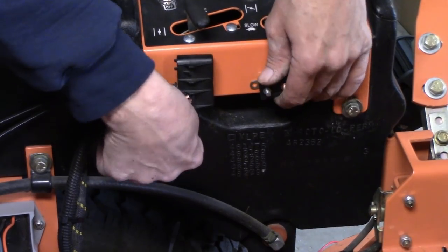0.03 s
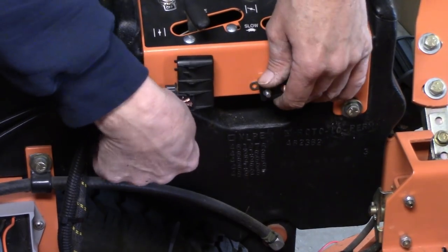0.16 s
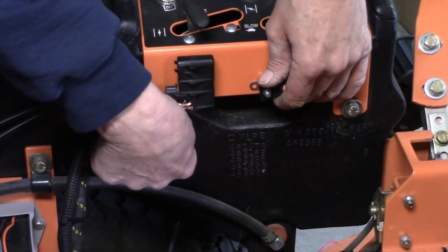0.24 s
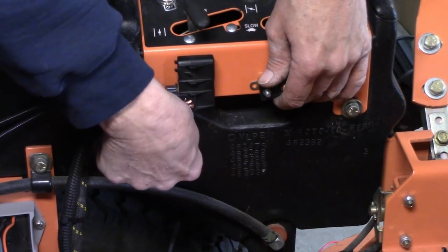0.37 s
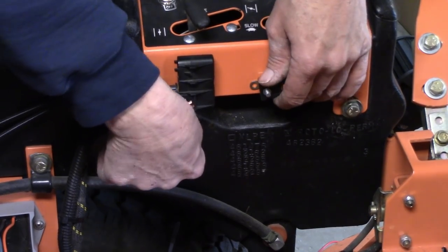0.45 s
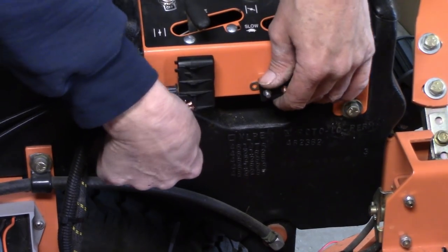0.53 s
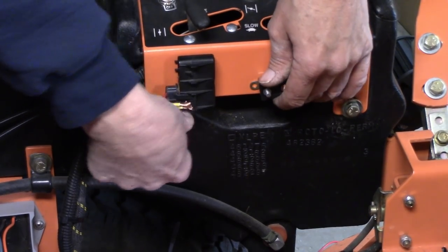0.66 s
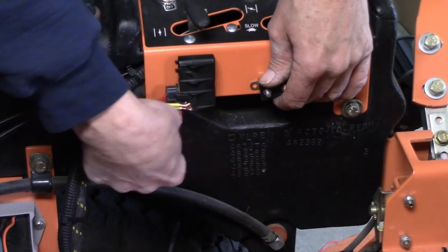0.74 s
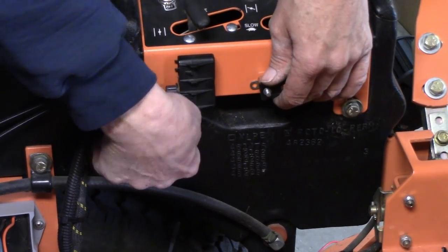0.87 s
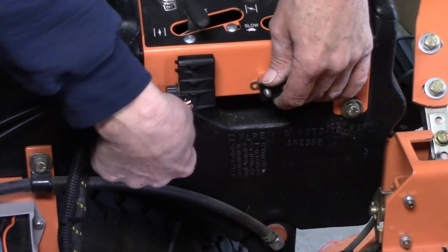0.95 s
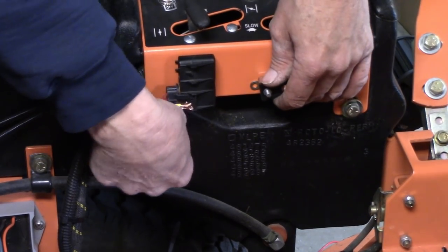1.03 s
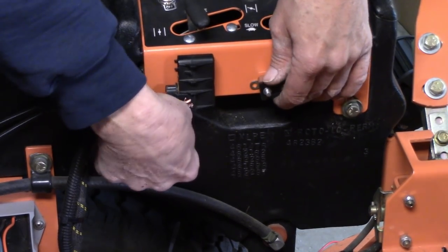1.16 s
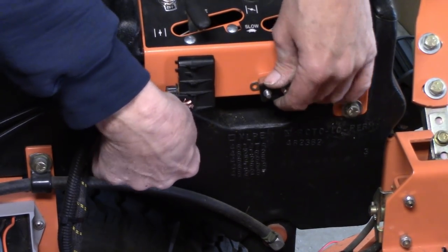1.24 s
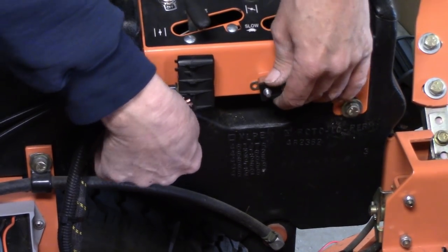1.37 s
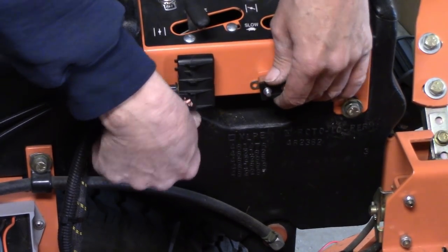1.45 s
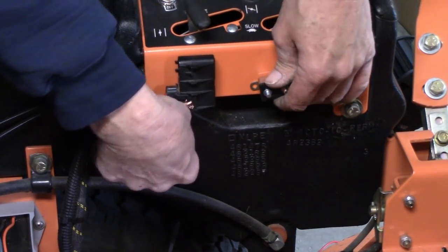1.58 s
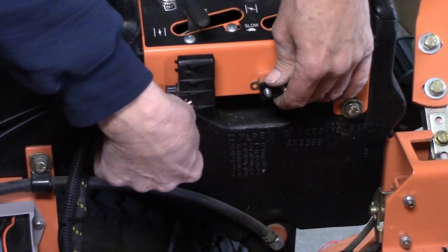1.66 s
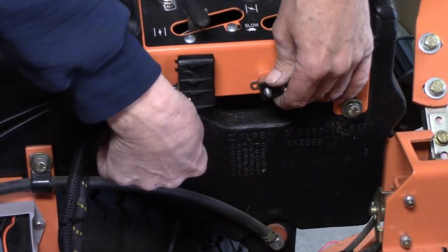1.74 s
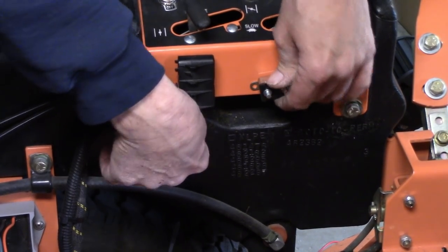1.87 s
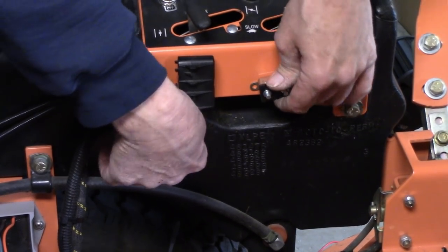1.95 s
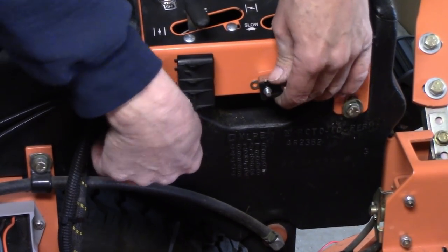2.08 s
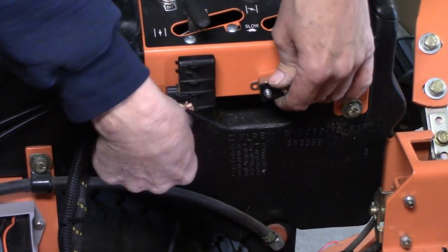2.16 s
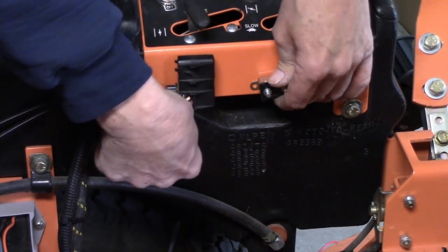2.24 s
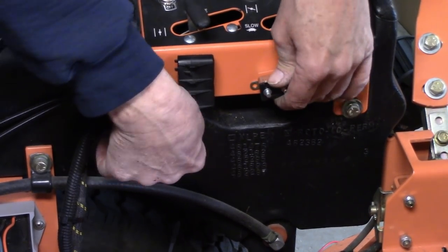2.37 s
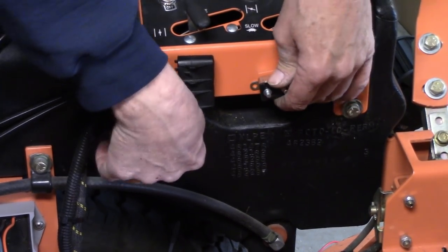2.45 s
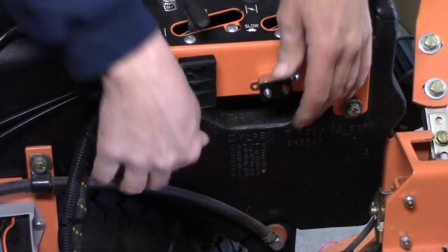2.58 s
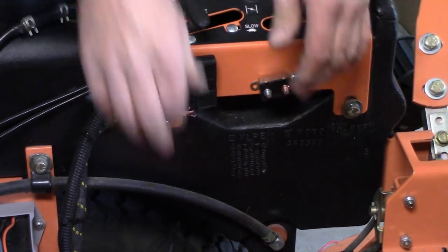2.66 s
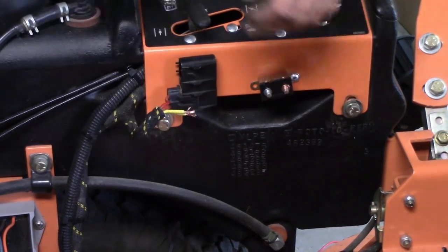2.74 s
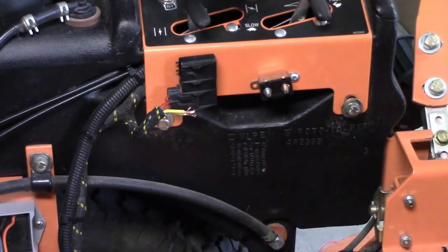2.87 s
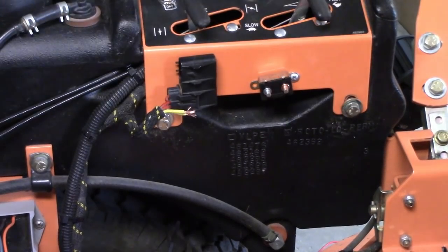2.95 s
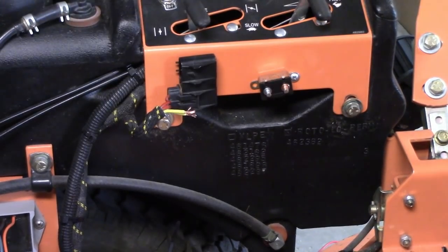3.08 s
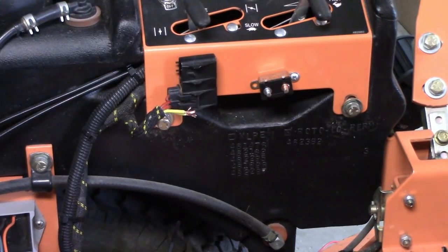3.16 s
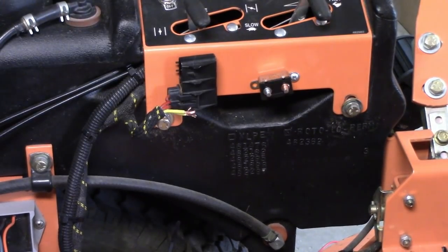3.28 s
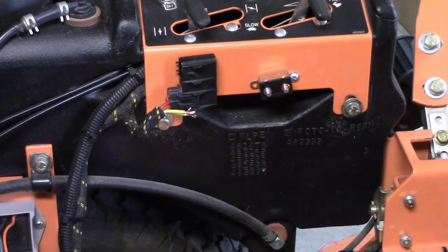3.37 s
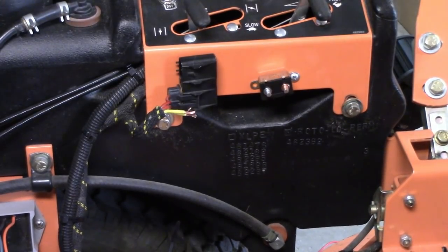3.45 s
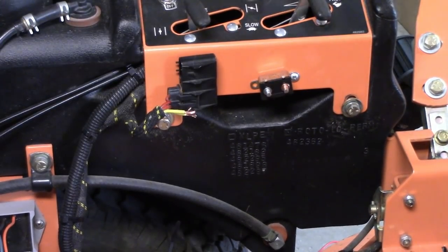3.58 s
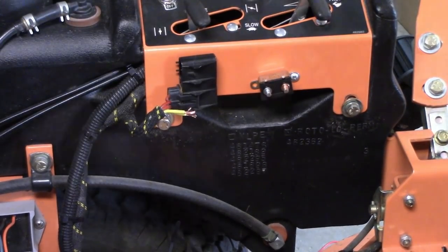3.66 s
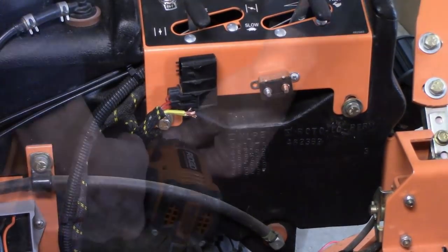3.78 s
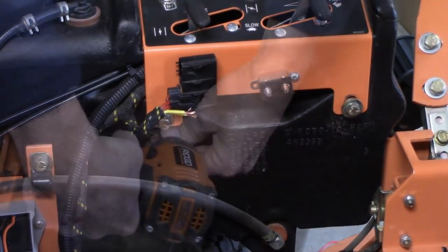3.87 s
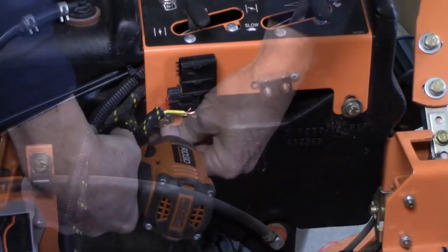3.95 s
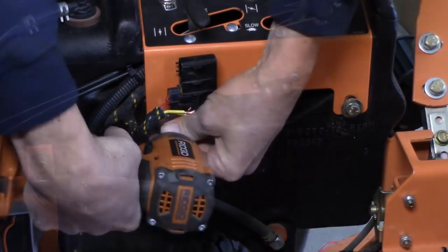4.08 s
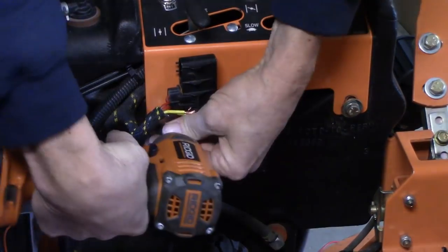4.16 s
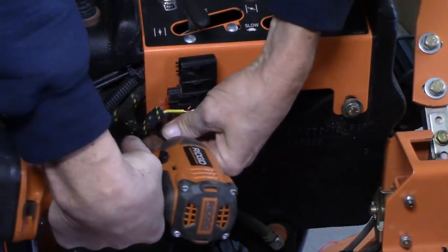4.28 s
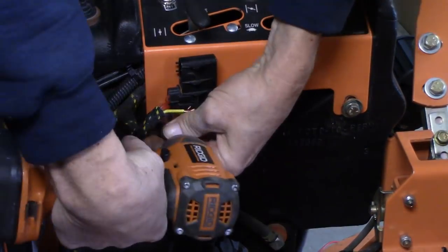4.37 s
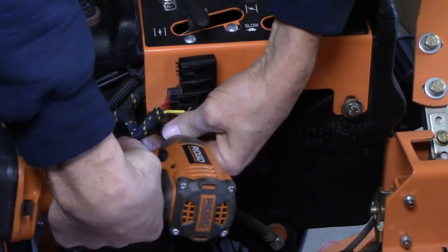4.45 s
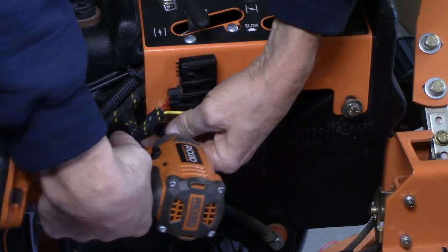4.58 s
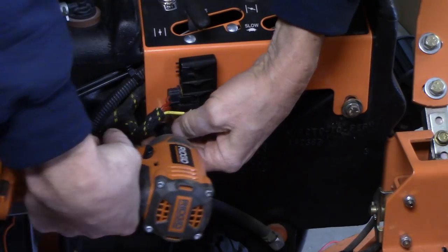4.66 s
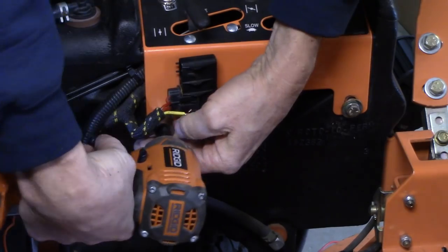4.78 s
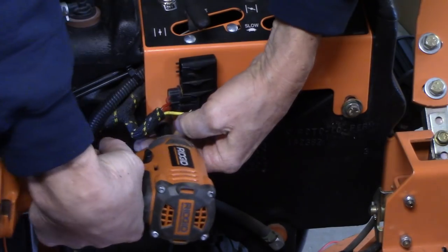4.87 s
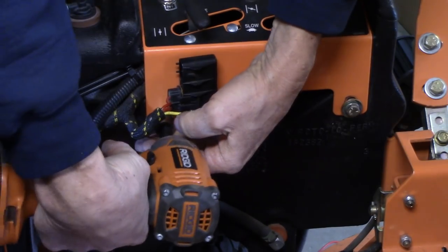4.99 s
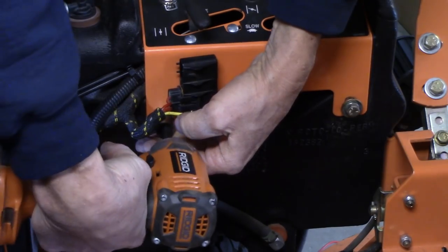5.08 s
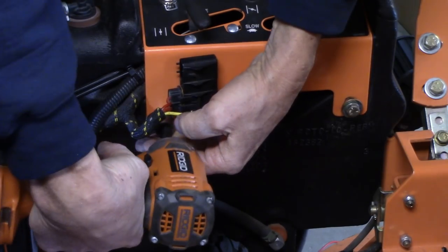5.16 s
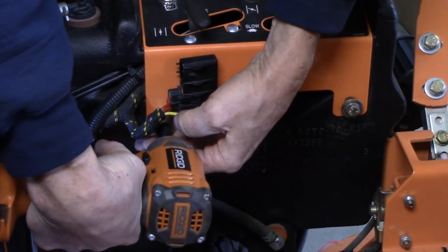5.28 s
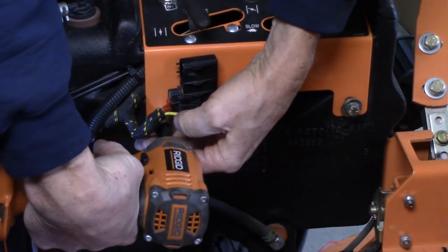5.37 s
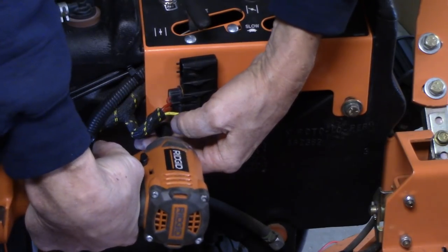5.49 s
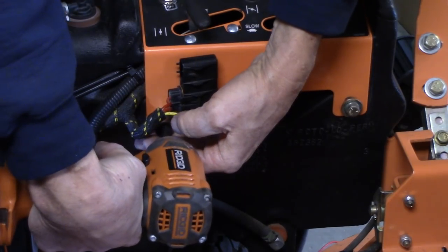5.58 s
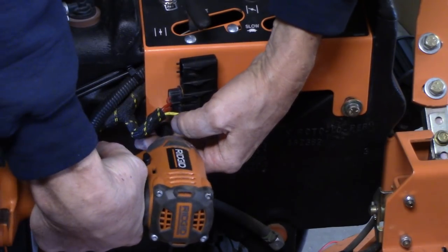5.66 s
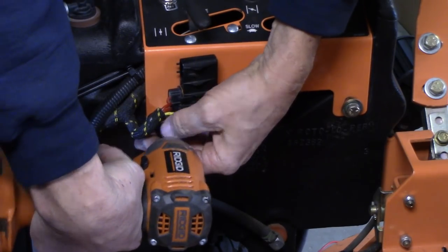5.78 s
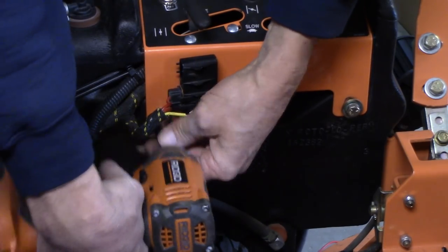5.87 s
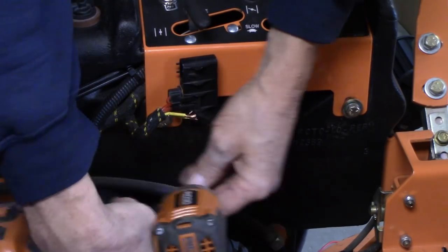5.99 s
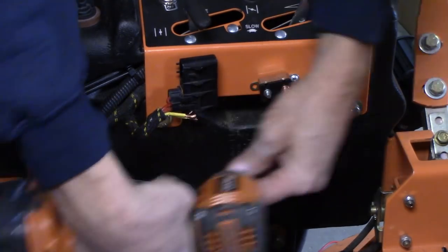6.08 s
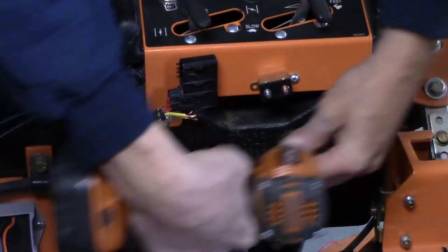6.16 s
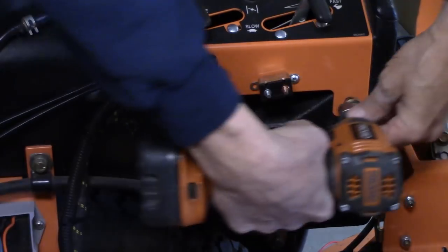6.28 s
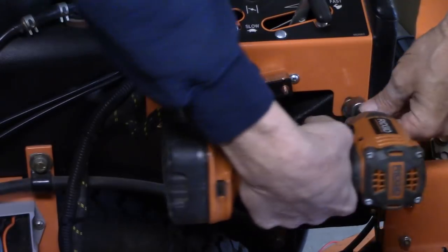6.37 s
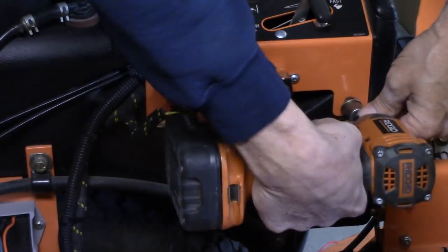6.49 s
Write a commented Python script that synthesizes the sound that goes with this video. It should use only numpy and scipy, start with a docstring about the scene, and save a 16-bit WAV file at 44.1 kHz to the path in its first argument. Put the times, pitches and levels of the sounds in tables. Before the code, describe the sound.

Small terminals and a plastic connector click and clack against a sheet-metal panel, then a cordless impact driver blips twice and hammers a bolt tight.

```python
"""A cordless impact driver in a workshop blips twice, spins a bolt down and hammers it tight:
geared tones and noise follow the rotor's speed, and each blow rings the anvil and a sheet-steel console.
Before that, wire terminals and a plastic connector click on the mower's console, as damped modes and
short noise bursts; the last touches are the socket landing on the next bolt. Something judders on a fender,
hands and cloth shuffle, and a small dog yaps faintly in harmonics, all over echo and quiet air noise."""
import sys
import numpy as np
from scipy import signal
from scipy.fft import rfft, irfft, next_fast_len
from scipy.io import wavfile
from scipy.ndimage import map_coordinates

SR = 44100
rng = np.random.default_rng(int(sys.argv[2]) if len(sys.argv) > 2 else 0)


def int16_out(signal):
    """Quantize to a 16-bit WAV file."""
    q = np.round(np.clip(np.atleast_2d(signal).T, -1, 1) * 32767)
    wavfile.write(sys.argv[1], SR, q.astype(np.int16))


N = 287973
NOW = np.arange(N) / SR  # time in the scene [s]
AGE = np.arange(SR) / SR  # time since an event [s]

# pulls of the trigger: (pressed [s], released [s], spin-up time [s], run-down time [s],
# top motor speed [turns/s], gear level [dB], console rumble level [dB], socket rattle level [dB])
TRIGGER_PULLS = [(4.172, 4.31, 0.014, 0.02, 197, -19, -26, -25),
                 (4.506, 4.621, 0.011, 0.023, 430, -23, -34, -20),
                 (4.823, 5.945, 0.039, .046, 410, -15.5, -26.5, -31)]
# low modes of the console: (frequency [Hz], level [dB], undamped t60 [s])
CONSOLE_MODES = [(134.4, -17.5, 1), (194.6, -8.5, 0.2), (261, -8.5, 0.16), (292, -3.5, 0.21),
                 (343, -3.5, 0.28), (382.2, -1.5, 0.17), (471, -0.5, 0.1), (640.6, -4.5, 0.17),
                 (675, 0, 0.12), (754, -3.5, 0.1), (954, -5, 0.12)]
# modes of the loose socket: (frequency [Hz], level [dB])
SOCKET_RESONANCES = [(3050, -3.5), (4270, -3.5), (6850, -10)]
# spectrum of the console's thud and rumble: (frequency [Hz], relative level per Hz [dB])
THUD_SPECTRUM = [(65, -40.5), (135, -7), (200, -2), (400, 4), (720, -2), (1150, -7), (2000, -18),
                 (5000, -90.5)]
# spectrum of plastic clacks and scuffs: (frequency [Hz], relative level per Hz [dB])
CLACK_SPECTRUM = [(400, -26), (1050, -15), (1650, 2), (2100, -2.5), (3000, -1.5), (4300, -8), (6000, -19),
                  (16000, -64)]

HAMMER_START_S, BLOW_PERIOD_S, BLOW_COUNT = 5.026, .02325, 37


def amp(db):
    """Level: decibels become an amplitude ratio."""
    return 10 ** (np.asarray(db) / 20)


def unit(x):
    """Normalisation: x scaled to an rms of 1."""
    return x / np.sqrt(np.mean(x ** 2) + 1e-20)


def along(points, hz):
    """Logarithmic frequency: (Hz, value) points interpolated on a log axis."""
    f, v = np.transpose(points)
    return np.interp(np.log(hz + 1), np.log(f + 1), v)


def curve(rows):
    """Linear interpolation: (s, value) points become one value a sample."""
    return np.interp(NOW, *np.transpose(rows))


def wobble(rate, size=N):
    """Slow modulation: a smooth random curve with rate knots a second."""
    knots = rng.standard_normal(int(size * rate / SR) + 4)
    return map_coordinates(knots, [NOW[:size] * rate])


def filtered(x, response):
    """Linear filtering: the spectrum of x times a response of frequency."""
    m = next_fast_len(len(x) + SR // 4)
    return irfft(rfft(x, m) * response(np.fft.rfftfreq(m, 1 / SR)), m)[:len(x)]


def coloured(x, spectrum):
    """Spectral shaping: x filtered by a level curve, at rms 1."""
    return unit(filtered(x, lambda hz: amp(along(spectrum, hz))))


def noise(spectrum, size=N):
    """Coloured noise: fresh white noise shaped to a spectrum, at rms 1."""
    return coloured(rng.standard_normal(size), spectrum)


def add(track, s, sound):
    """Superposition: mixes a sound into the track at time s."""
    part = track[round(s * SR):][:len(sound)]
    part += sound[:len(part)]


def burst(hold, t60, attack=0.00043):
    """Contact envelope: a fast rise, a hold (s), then exponential decay."""
    decay = amp(-60 * np.maximum(AGE - hold, 0) / t60)
    return decay * (1 - np.exp(-AGE / attack))


def gate(start, stop, rise, fall):
    """First-order response: eases towards 1 around start, decays from stop, with time constants in s."""
    risen = np.logaddexp(0, 3 * (NOW - start) / rise) / 3
    return (1 - np.exp(-risen)) * np.exp(-np.maximum(NOW - stop, 0) / fall)


def ring(modes, scatter_db=0, damping=0):
    """Modal synthesis: decaying sines of alternating sign; extra damping (dB/s) shortens them all."""
    total = 0
    for k, (hz, db, t60) in enumerate(modes):
        size = amp(db + scatter_db * rng.normal() - 60 * AGE / t60)
        total = total + (-1) ** k * size * np.sin(2 * np.pi * hz * AGE)
    return amp(-damping * AGE) * total


def resonances(x, modes, q=22):
    """Resonance: x through parallel second-order band-passes (Hz, dB) of equal sharpness q."""
    def response(f):
        return sum(amp(db) * 1j * f / (q * (hz - f * f / hz) + 1j * f) for hz, db in modes)
    return filtered(x, response)


def contact(spectrum, envelope):
    """Minimum-phase excitation: a gritty force drives a body; the envelope sets the energy."""
    size = len(envelope)
    level = amp(along(spectrum, np.fft.rfftfreq(size, 1 / SR)))
    cepstrum = irfft(np.log(level), size)
    fold = 1 + np.sign(np.fft.fftfreq(size))  # the body answers only after the force
    body = np.exp(rfft(cepstrum * fold))
    force = rng.standard_normal(size) * envelope
    sound = irfft(rfft(force) * body, size)
    return unit(sound) * np.sqrt(np.mean(envelope ** 2))


def steel_blows(blows, modes, hold, t60, ring_db, ring_t60=0.04, scatter_db=4.0, shift=0.0099):
    """Impact of steel on steel: each (s, dB) is a noise crash and modes in a fresh mix, as the part turns."""
    # spectrum of the crash: (frequency [Hz], relative level per Hz [dB])
    crash_spectrum = [(300, -21.5), (1000, -2), (3000, 2.5), (6000, 0.5), (12000, -7), (16000, -18.5)]
    out, t = np.zeros(N), AGE[:SR // 10]
    steel, envelope = noise(crash_spectrum), burst(hold, t60)[:len(t)]
    hz, level = np.transpose(modes)[..., None]
    for s, db in blows:
        size = amp(ring_db + level + scatter_db * rng.normal(size=hz.shape) - 60 * t / ring_t60)
        shifted_hz = hz * (1 + shift * rng.normal(size=hz.shape))
        turns = shifted_hz * t + rng.random(hz.shape)
        ringing = np.sum(size * np.sin(2 * np.pi * turns), axis=0)
        crash = envelope * steel[rng.integers(N - len(t)):][:len(t)]
        add(out, s, amp(db) * (crash + ringing))
    return out


def blow_times():
    """Periodic impact: an even beat, slower as the hammer engages and as the bolt comes tight."""
    settle_lag_s, stall_lag_s = .0065, .009  # time lost over the first and the last blows
    slowing_s = .0000196  # growth of the period per blow
    k = np.arange(BLOW_COUNT)
    even = HAMMER_START_S + (BLOW_PERIOD_S + slowing_s * k / 2) * k
    settling = settle_lag_s * (1 - np.exp(-k / 2))
    stalling = stall_lag_s * np.exp(2 * (k - k[-1]))
    return even + settling + stalling


def hammer(crash_db=-12.0, jitter=.0002, panel_db=-24, slack_db=9, seating=0.028, rattle_db=-27.5,
           rebound_s=.015, rebound_db=-14):
    """Repeated modal excitation: blows crash on the anvil and ring the console, so it buzzes at the blow rate."""
    # modes of the anvil: (frequency [Hz], level [dB])
    anvil_resonances = [(2490, -1.5), (3010, -1.5), (3470, -2), (5170, -3), (5760, 0), (9030, -1),
                        (11100, -7.5)]
    # frame modes left ringing by the hammer: (frequency [Hz], level [dB], t60 [s])
    frame_modes = [(130, -41.5, 1.1), (424, -34.5, 1.43), (703, -42.5, 2.1)]
    # spectrum of rattling plastic: (frequency [Hz], relative level per Hz [dB])
    fittings_spectrum = [(250, -24), (600, 3.5), (2400, -2.5), (6000, -36.5)]
    times = blow_times()
    blows = [(t + rng.normal(0, jitter), crash_db + rng.normal()) for t in times]
    # after each blow the hammer's lugs slip over the anvil
    slips = [(t + rebound_s + 10 * rng.normal(0, jitter), db + rebound_db) for t, db in blows]
    crash = steel_blows(blows + slips, anvil_resonances, hold=0.0024, t60=0.026, ring_db=-7)
    buzz, shake = np.zeros(N), np.zeros(N)
    panel, rattle = ring(CONSOLE_MODES), amp(rattle_db) * burst(0, 0.21)
    for t in times:
        # the bolt passes more of the blow to the console as it seats
        loose_db = slack_db * np.exp(-(t - times[0]) / seating)
        add(buzz, t, amp(panel_db - loose_db + rng.normal()) * panel)
        add(shake, t, rattle)
    add(buzz, times[-1], ring(frame_modes))
    # the shaken console rattles its plastic fittings
    return crash + shake * noise(fittings_spectrum), buzz


def drive(grit_db=2, whine_db=-11.0, lower_mesh_db=-7, upper_mesh_db=-6, waver=0.0146, inertia=2.1,
          sing_db=-11.0, gear_law=0.92, rumble_rise=0.91, rumble_fall=4.4, dull_hz=4500):
    """Gear meshing: tones at multiples of the motor speed amid grinding noise, louder and brighter with speed."""
    # spectrum of the grinding: (frequency [Hz], relative level per Hz [dB])
    grind_spectrum = [(300, -57), (800, -4), (2700, -1), (4200, 3), (5500, -3), (9000, -5.5), (12800, -16),
                      (16000, -30.5)]
    # hammering loads the motor: mean share of speed lost, changes of level [dB]
    load_sag, load_gear_db, load_rumble_db = 0.41, -7.5, -6
    bog_s, recover_s = .008, .06  # times to bog down and to recover
    out, blows = np.zeros(N), blow_times()
    load = gate(blows[0], blows[-1], bog_s, recover_s)
    # the spring brakes the motor before each blow
    wind_up = 1 - np.cos(2 * np.pi * (NOW - blows[0]) / BLOW_PERIOD_S) / 2
    for pressed, released, spin_up, run_down, top_hz, gear_db, rumble_db, _ in TRIGGER_PULLS:
        speed = gate(pressed, released, spin_up, run_down)
        # the pitch lags behind the loudness
        rotor = gate(pressed, released, inertia * spin_up, inertia * run_down)
        motor_hz = top_hz * rotor * (1 - load_sag * load * wind_up) * (1 + waver * wobble(500))
        turn = 2 * np.pi * np.cumsum(motor_hz) / SR
        teeth = rng.standard_normal(N) * amp(grit_db * wobble(420))
        whine = np.sin(12 * turn)
        whine += amp(lower_mesh_db) * np.sin(4 * turn) + amp(upper_mesh_db) * np.sin(19 * turn)
        gears = coloured(teeth, grind_spectrum) + amp(whine_db) * whine
        dull = filtered(gears, lambda hz: 1 / (1 + (hz / dull_hz) ** 4))
        singing = amp(sing_db) * unit(resonances(teeth, SOCKET_RESONANCES))
        brightened = dull + speed * (gears - dull + singing)
        out += amp(gear_db + load_gear_db * load) * speed ** gear_law * brightened
        # the bolt shakes the console
        shaking = gate(pressed, released, rumble_rise * spin_up, rumble_fall * run_down) ** 4
        rumble = unit(noise(THUD_SPECTRUM) * amp(3.1 * wobble(45)))
        out += amp(rumble_db + load_rumble_db * load) * shaking * rumble
    return out


def socket():
    """Impact across free play: the loose socket knocks hard, and rattles unevenly while it spins freely."""
    # hard knocks on the bolt head: (time [s], level [dB])
    hard_knocks = [(4.186, -17.5), (4.196, -7), (4.211, -11), (4.226, -6), (4.248, -9), (4.314, -14.5),
                   (4.325, -13.5), (4.515, -13.5), (4.625, -20), (5.915, -17), (5.932, -15)]
    rattles_per_s, rattle_scatter_db = 64, 5.5
    knocks, blows = list(hard_knocks), blow_times()
    for pressed, released, spin_up, *_, rattle_db in TRIGGER_PULLS:
        chance = rng.standard_normal((128, 2))
        steps = np.arange(len(chance)) + .5 + 0.34 * chance[:, 0]
        times = pressed + spin_up + steps / rattles_per_s
        for s, size in zip(times, chance[:, 1]):
            hammering = blows[0] < s < blows[-1]
            if s < released and not hammering:
                knocks.append((s, rattle_db + rattle_scatter_db * size))
    return steel_blows(knocks, SOCKET_RESONANCES, hold=0.00088, t60=0.013, ring_db=-7.5)


def trigger():
    """Impulsive excitation: the switch clicks just before the motor starts and excites the socket's modes."""
    # clicks of the switch: (time [s], level [dB])
    clicks = [(4.487, -46), (4.78, -48)]
    return steel_blows(clicks, SOCKET_RESONANCES, hold=0.006, t60=0.06, ring_db=2)


def skipping(hold, t60, chatter_db=4.5, bounce_t60=0.026):
    """Intermittent contact: a scrape over tiny contacts, then weakening bounces at uneven gaps."""
    bounce_gap_s, bounce_count = 0.0089, 4  # mean gap
    bounce_db, bounce_loss_db = -14.5, 3  # first bounce re the touch; loss a bounce
    smooth = burst(hold, t60)
    chattering = unit(smooth * amp(chatter_db * wobble(427)[:SR]))
    envelope = chattering * np.sqrt(np.mean(smooth ** 2))
    gaps = bounce_gap_s * (.5 + rng.random(bounce_count))
    for k, s in enumerate(hold + np.cumsum(gaps)):
        bounce = amp(bounce_db - bounce_loss_db * k + 2 * rng.normal())
        add(envelope, s, bounce * burst(0, bounce_t60))
    return envelope


def taps(clack_t60=0.038, tick_t60=0.036, thud_t60=0.066, part_t60=0.031, part_rough=0.54, detune=0.032):
    """Coupled impact: the terminal ticks, the plastic clacks and rings roughly, the console thuds."""
    # parts touching the console: (time [s], level [dB], thud re clack [dB], tick re clack [dB],
    # ring of the part [Hz], time in scraping contact [s])
    touches = [(0.070, -35.5, 7.5, -4, 1700, 0.0041), (0.0859, -14.5, -7, -7.5, 1654, 0.0044),
               (0.1718, -30.5, -1, -28, 1634, 0.0055), (0.5205, -24, -11.5, -20, 1618, 0.0023),
               (0.9003, -19.5, -10, -12.5, 1704, 0.0035), (1.1200, -29.5, -24, 6, 5750, 0.0095),
               (1.2531, -14, -11, -7, 1633, 0.0018), (1.4181, -17, -2, -16, 1387, 0.0029),
               (1.4264, -13.5, -13, -11, 1397, 0.0048), (1.597, -26.5, -31, 2.5, 5880, 0.004),
               (1.841, -31.5, -9.5, -25, 1690, 0.0018), (1.9092, -17.5, -6.5, -22, 1686, 0.0048),
               (1.928, -18.5, 2.5, -15.5, 1346, 0.0048), (2.0463, -32.5, -9, 2.5, 2780, 0.0083),
               (2.157, -36.5, 3, -29, 1710, 0.0015), (2.2287, -27, -15.5, 6, 5700, 0.0096),
               (2.5192, -39.5, -8, -3, 3780, 0.0055), (3.391, -39, -4.5, -22, 2390, 0.017),
               (3.8236, -34.5, -4, -20, 1175, 0.0038), (4.0401, -48.5, 8, -12, 1320, 0.0029),
               (4.538, -23, 8.5, -3, 1300, 0.005), (6.1501, -29.5, -8, -9, 2490, 0.0032),
               (6.414, -23, -6.5, 0, 1870, 0.012), (6.478, -30.5, -2, -8.5, 1015, 0.0047)]
    # spectrum of the terminal's tick: (frequency [Hz], relative level per Hz [dB])
    tick_spectrum = [(2000, -10), (4500, 3.5), (6500, 2), (9500, -4), (12000, -10), (16000, -22)]
    part_ratios, part_fall_db = (0.99, 1.72, 2.3), 5.5  # a part's modes re its ring; loss per mode
    out = np.zeros(N)
    for s, db, thud_db, tick_db, part_hz, hold in touches:
        clack = amp(-10) * contact(CLACK_SPECTRUM, skipping(hold, clack_t60))
        tick = amp(tick_db - 6.5) * contact(tick_spectrum, skipping(hold, tick_t60))
        waver = part_rough * wobble(890, SR)
        phase = 2 * np.pi * part_hz * AGE + waver
        tones = sum(amp(-part_fall_db * k) * np.sin(ratio * phase) for k, ratio in enumerate(part_ratios))
        part = amp(-12) * burst(hold, part_t60) * tones
        thud = amp(thud_db - 4.0) * contact(THUD_SPECTRUM, burst(hold, thud_t60))
        # the hand's pressure shifts and damps the modes
        pressed = [(hz * (1 + detune * rng.normal()), level, t60) for hz, level, t60 in CONSOLE_MODES]
        ringing = ring(pressed, scatter_db=4, damping=40) * (1 - np.exp(-AGE / 0.004))
        panel = amp(thud_db - 21.5) * ringing
        add(out, s, amp(db) * (clack + tick + part + thud + panel))
    return out


def washer(hz=10250, t60=0.37):
    """Free vibration: a loose steel washer pings as one decaying sine."""
    # rings of the washer: (time [s], level [dB])
    pings = [(0.085, -44), (1.254, -50), (4.326, -36.5)]
    out = np.zeros(N)
    for s, db in pings:
        add(out, s, amp(db) * burst(0, t60) * np.sin(2 * np.pi * hz * AGE))
    return out


def judder():
    """Stick-slip: something drags over the plastic fender, each slip knocking modes that shift with pressure."""
    # low modes of the fender: (frequency [Hz], level [dB], t60 [s])
    fender_modes = [(135, -11, 0.058), (300, 0, 0.19)]
    start_s, end_s, slips_per_s, level_db = 3.285, 3.39, 79, -42.5
    out = np.zeros(N)
    chance = rng.standard_normal((16, 3))
    for k, (late, size, press) in enumerate(chance):
        s = start_s + (k + 0.29 * late) / slips_per_s
        if s < end_s:
            modes = [(hz * (1 + 0.037 * press), db, t60) for hz, db, t60 in fender_modes]
            add(out, s, amp(level_db + 2 * size) * ring(modes) * (1 - np.exp(-AGE / 0.003)))
    return out


def shuffle():
    """Friction noise: as hands and weight shift, a soft low bump, a scuff and a cloth rustle swell and fade."""
    # the worker's moves: (time [s], length [s], bump level [dB], scuff level [dB], rustle level [dB])
    moves = [(0, 0.085, -49.5, -56, -52.5), (0.76, 0.0094, -62, -55, -49.5),
             (3.272, 0.11, -47, -55.5, -54.5), (3.489, 0.14, -70, -61, -52), (3.625, 0.04, -68, -56, -54)]
    # spectrum of cloth: (frequency [Hz], relative level per Hz [dB])
    cloth_spectrum = [(180, -33), (330, 1.5), (1150, -10), (5500, -13.5), (15000, -35)]
    rise_share, release_s = 0.17, 0.036  # rise time as a share of the length
    out = np.zeros(N)
    bump = unit(noise([(40, -21), (115, -2), (330, -8), (2000, -45)]) * amp(2.8 * wobble(51)))
    scuff = unit(noise(CLACK_SPECTRUM) * amp(2.1 * wobble(200)))
    cloth = unit(noise(cloth_spectrum) * amp(3.2 * wobble(170)))
    for s, length, bump_db, scuff_db, cloth_db in moves:
        rubbing = amp(bump_db) * bump + amp(scuff_db) * scuff + amp(cloth_db) * cloth
        out += gate(s, s + length, rise_share * length, release_s) * rubbing
    return out


def dog(hz=510, swell=0.0195, fall=0.153, yard_db=-9, yard_t60=0.48):
    """Harmonic voicing: rough yaps of three harmonics swell, sag in pitch and echo across the yard."""
    # yaps: (time [s], relative level [dB])
    yaps = [(.41, -43.5), (0.691, -41.5), (1.79, -44), (2.071, -40), (2.49, -45), (2.999, -43)]
    out, u = np.zeros(N), AGE / swell
    for s, db in yaps:
        rough = .03 * wobble(400, SR)
        pitch_hz = hz * (1 - fall * np.tanh(u / 2) ** 2 + rough)
        phase = 2 * np.pi * np.cumsum(pitch_hz) / SR
        voice = amp(0.5) * np.sin(phase) + np.sin(2 * phase) + np.sin(3 * phase)
        add(out, s, amp(db - 7.5) * (u * np.exp(1 - u)) ** 4 * voice)
    yard = rng.standard_normal(SR) * burst(0, yard_t60)
    return out + amp(yard_db) * signal.fftconvolve(out, yard / np.linalg.norm(yard))[:N]


def shop(x, delay=.005, near_db=6, near_t60=0.27, lumpy_db=2):
    """Reverberation: x convolved with quick reflections and a longer echo, redrawn every third of a second."""
    # reverberation of the workshop: (frequency [Hz], t60 [s])
    decay_times = [(100, 1), (260, 0.45), (700, 0.74), (1840, 0.55), (4850, 0.52), (12800, 0.23)]
    out, size = np.zeros(N), SR // 3
    for start in range(0, N, size):
        lumpy = rng.standard_normal(SR) * amp(lumpy_db * wobble(264.3, SR))
        hz, t, z = signal.stft(lumpy, SR, nperseg=256)
        far = amp(-60 * t / along(decay_times, hz)[:, None])
        near = amp(near_db - 60 * t / near_t60)
        tail = signal.istft(z * (far + near), SR, nperseg=256)[1]
        echo = signal.fftconvolve(x[start:start + size], tail / np.linalg.norm(tail))
        add(out, start / SR + delay, echo)
    tone = [(150, 7.0), (500, 5), (4000, -4.5), (12000, -10.5)]  # (frequency [Hz], gain [dB])
    return filtered(out, lambda hz: amp(along(tone, hz)))


def quiet_air():
    """Broadband ambience: stationary coloured noise under a slowly drifting level."""
    # spectrum of the air: (frequency [Hz], relative level per Hz [dB])
    air_spectrum = [(25, -18.5), (130, -3), (480, -5), (1300, -13.5), (5000, -23), (8100, -23),
                    (11000, -32), (16000, -39.5)]
    # mean level of the air: (time [s], level [dB])
    air_levels = [(0, -57.5), (3.65, -55), (3.92, -60.5), (6.5, -54.5)]
    return amp(curve(air_levels) + wobble(4.98)) * noise(air_spectrum)


def scene():
    """Superposition: driver and hand work close by, the dog far off, with the shop's echo and air."""
    crash, buzz = hammer()
    driver = drive() + crash + socket() + trigger()
    parts = taps()
    yaps = dog()
    echo = shop(amp(-5.0) * parts + amp(-6.0) * driver + amp(-16.5) * buzz + yaps)
    handling = washer() + shuffle() + judder()
    return (driver + buzz + parts + handling + yaps + echo + quiet_air())[None]


def record(dry, low_cut_hz=68, top_hz=16100):
    """Band limiting and soft saturation: thins deep bass, rounds high peaks, cuts the extreme treble."""
    high_pass = signal.butter(2, low_cut_hz, "high", fs=SR, output="sos")
    thin = signal.sosfilt(high_pass, dry[0])
    soft = thin / (1 + np.abs(thin / .9) ** 4) ** (1 / 4)
    return filtered(soft, lambda hz: 1 / (1 + (hz / top_hz) ** 200))[None]


dry = scene()
out = record(dry)
int16_out(out)
```